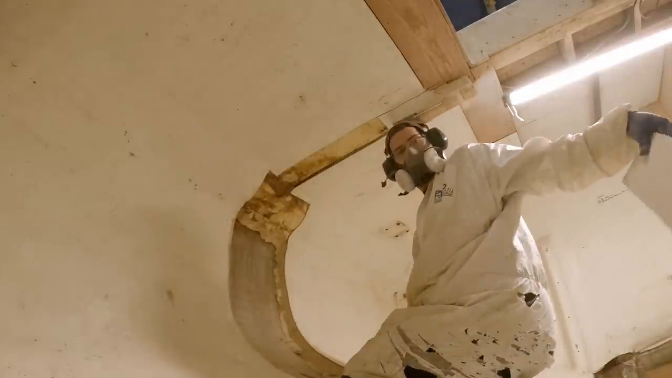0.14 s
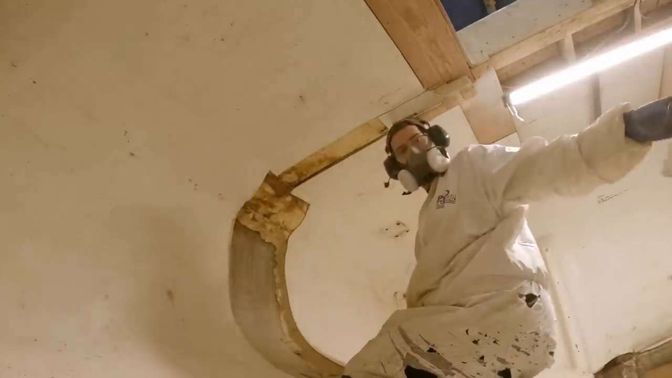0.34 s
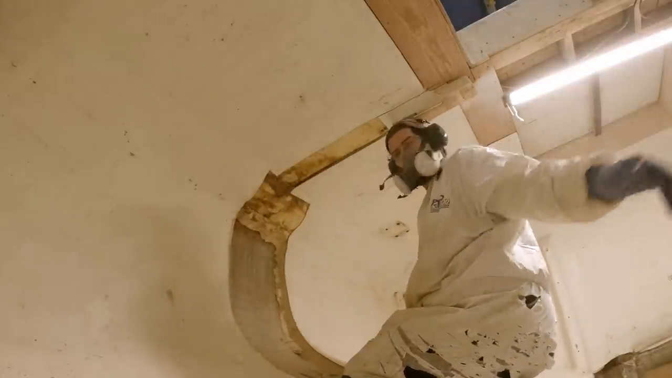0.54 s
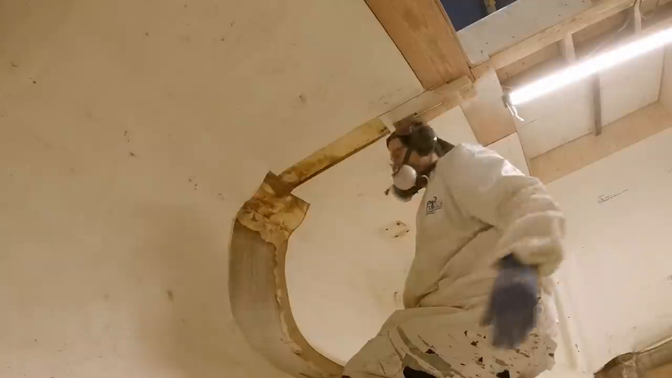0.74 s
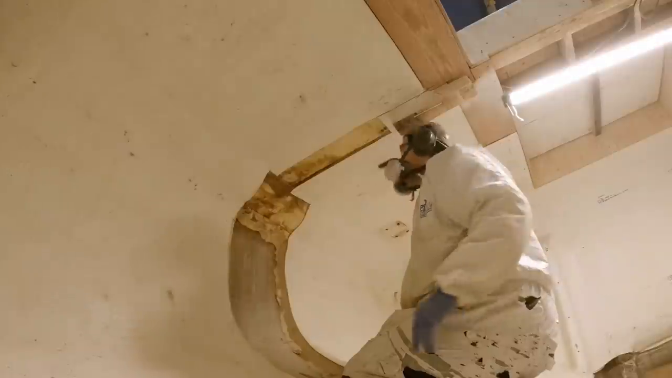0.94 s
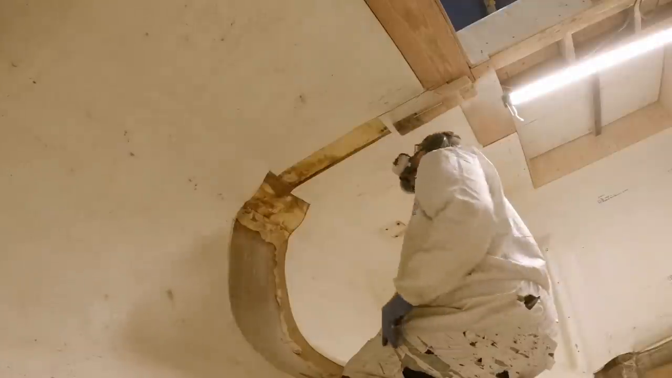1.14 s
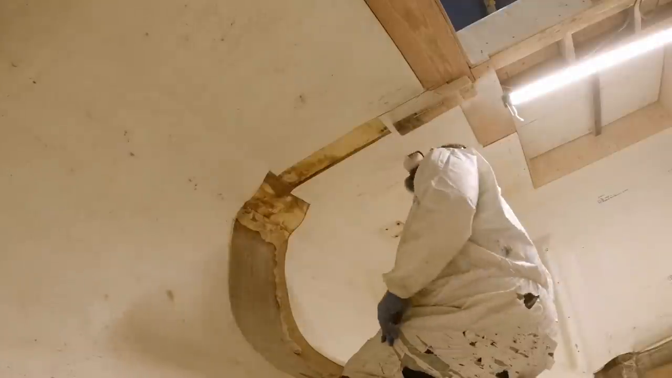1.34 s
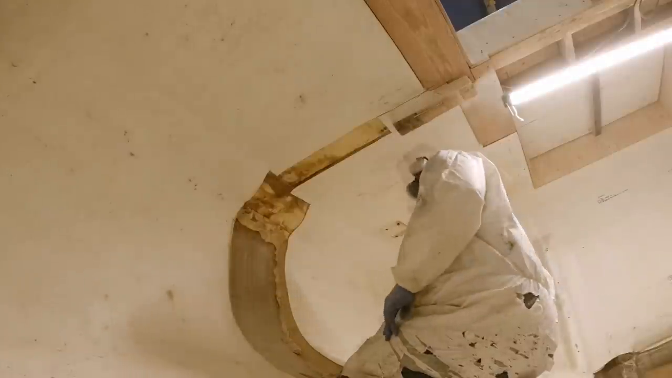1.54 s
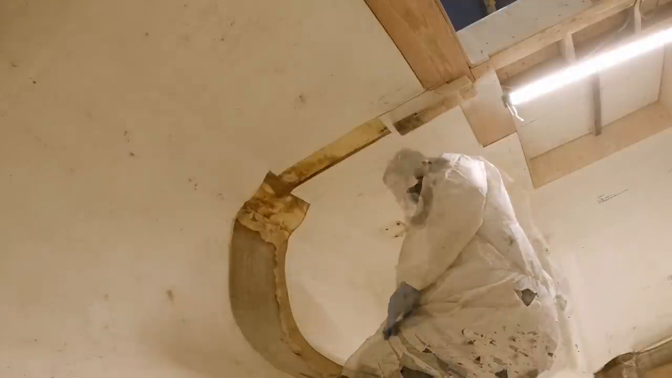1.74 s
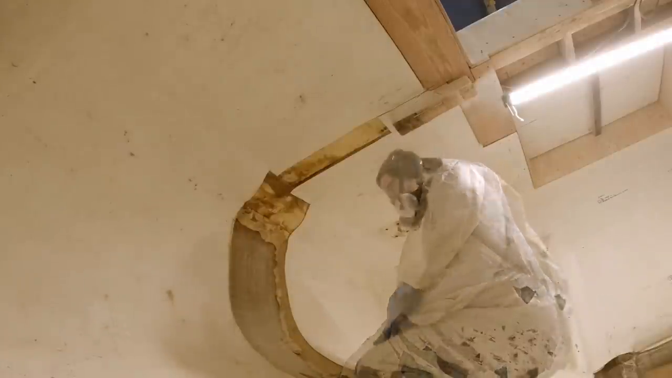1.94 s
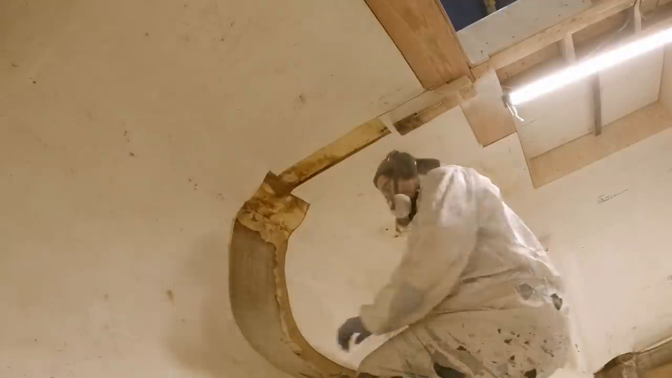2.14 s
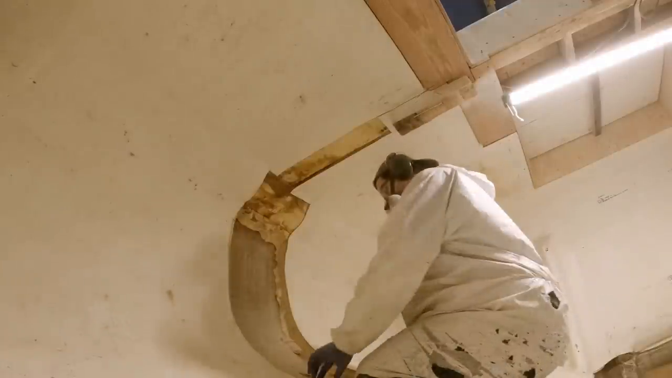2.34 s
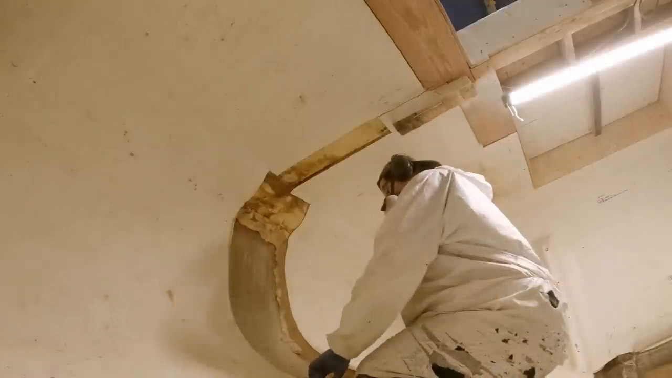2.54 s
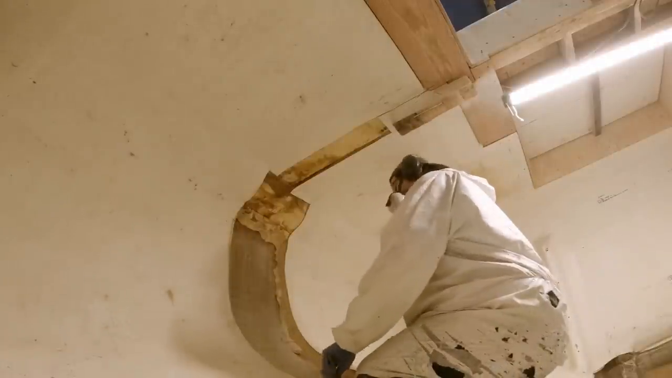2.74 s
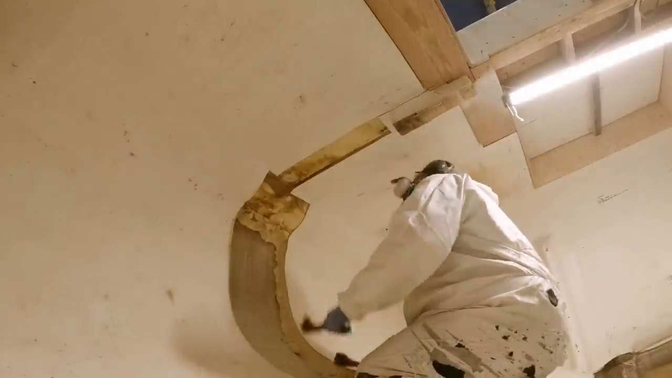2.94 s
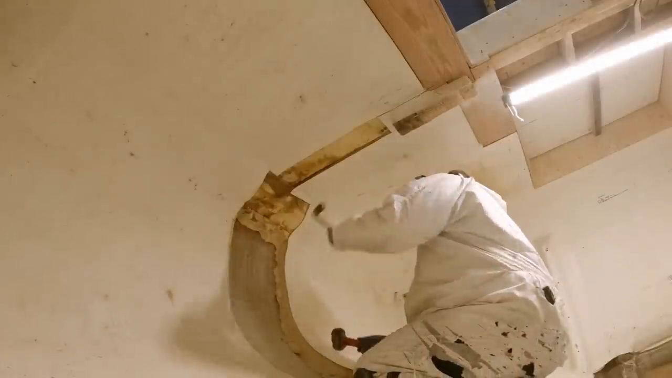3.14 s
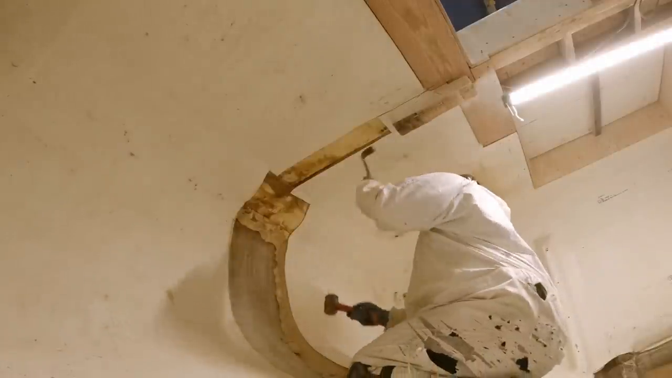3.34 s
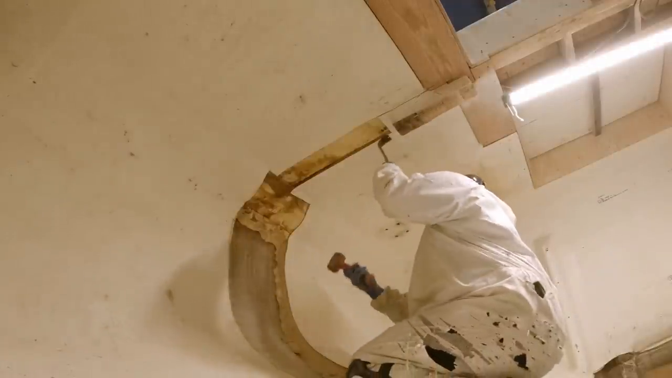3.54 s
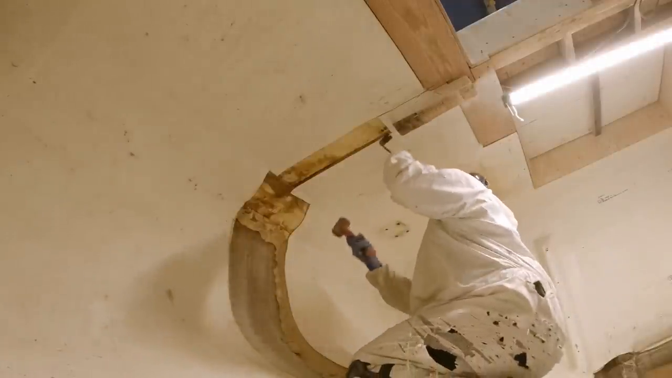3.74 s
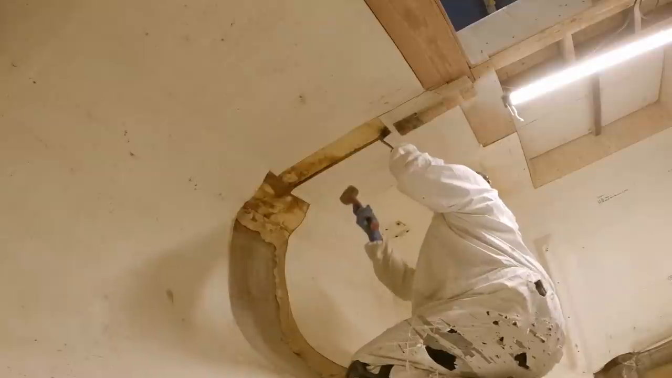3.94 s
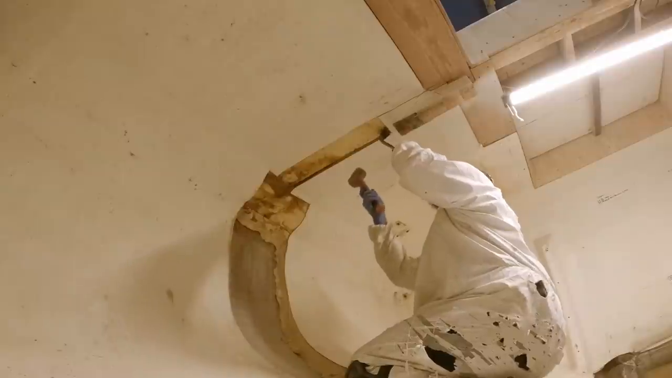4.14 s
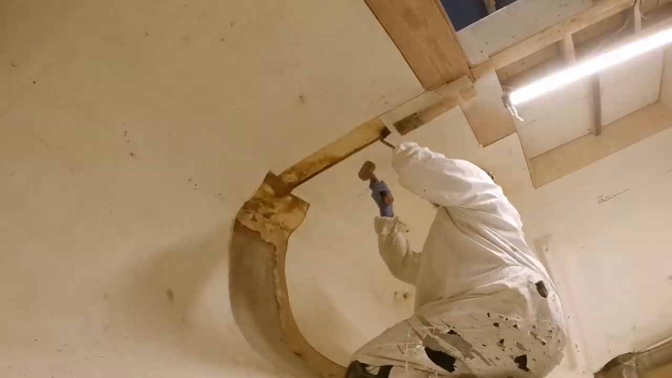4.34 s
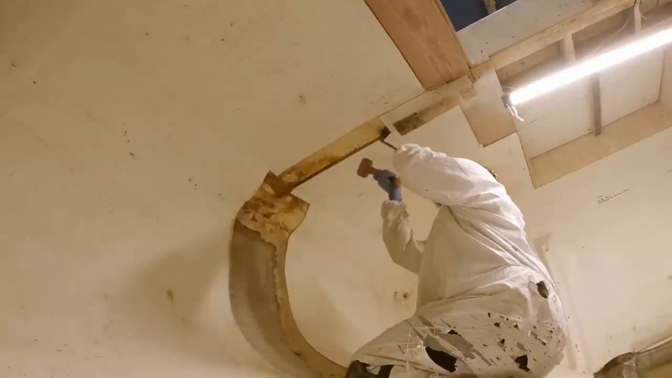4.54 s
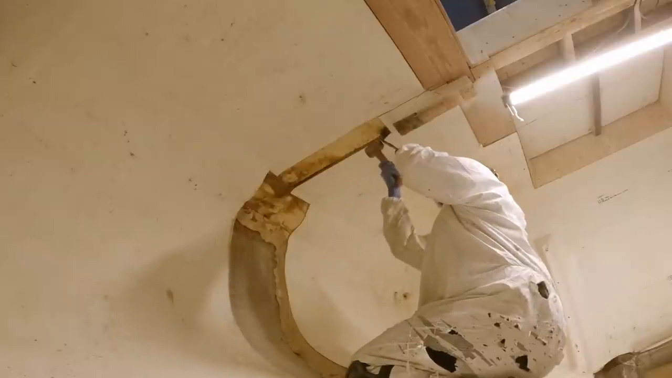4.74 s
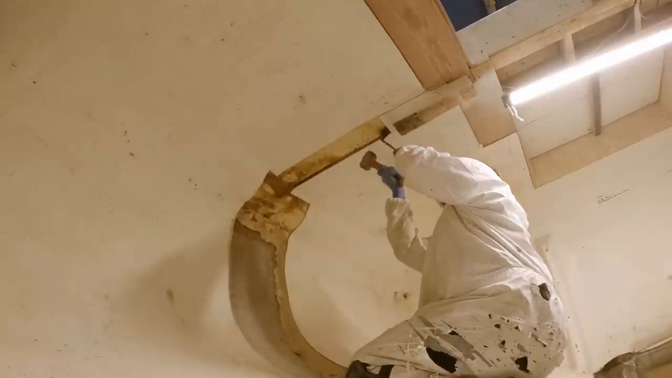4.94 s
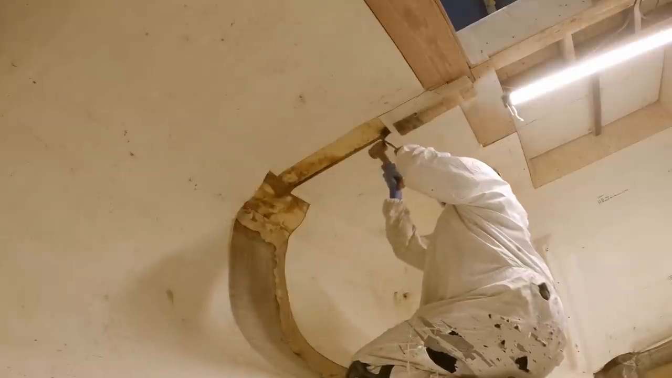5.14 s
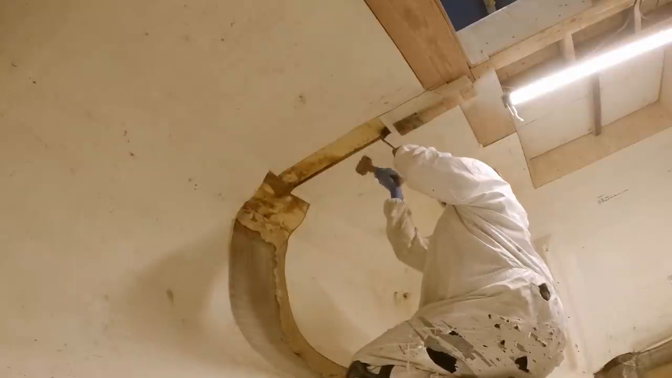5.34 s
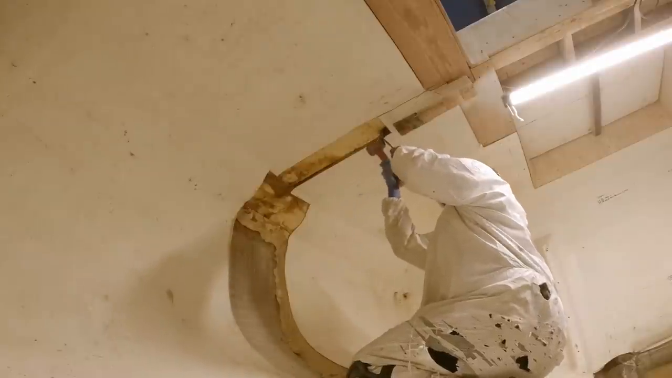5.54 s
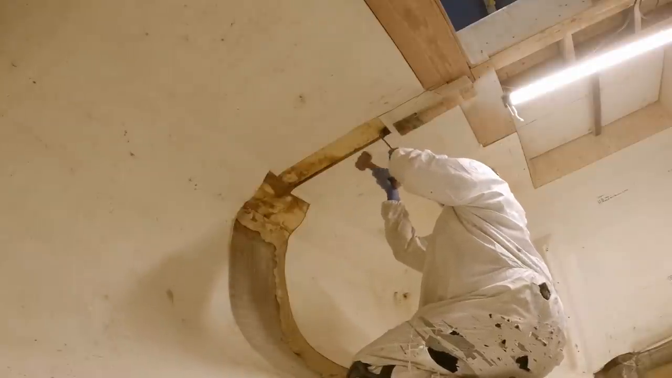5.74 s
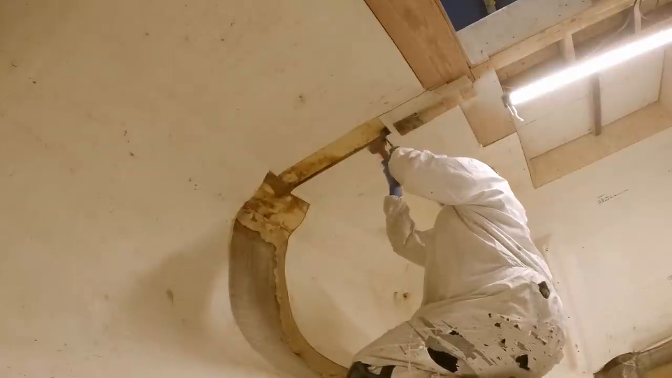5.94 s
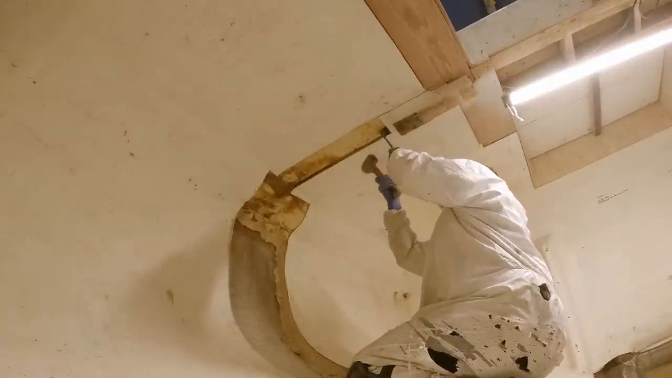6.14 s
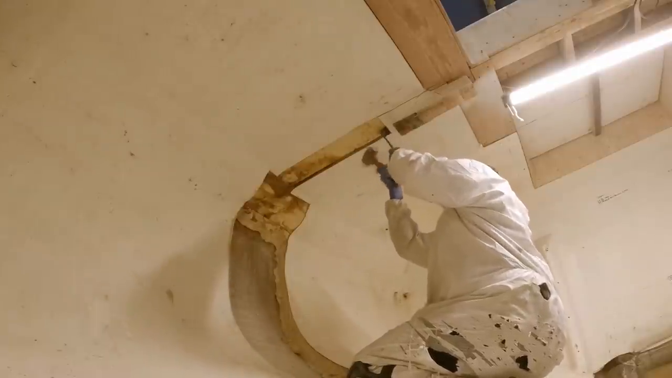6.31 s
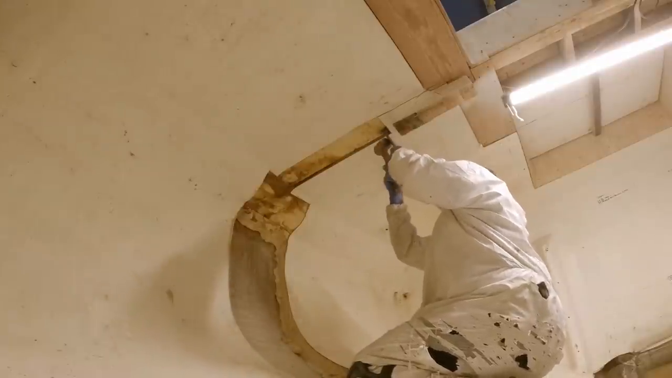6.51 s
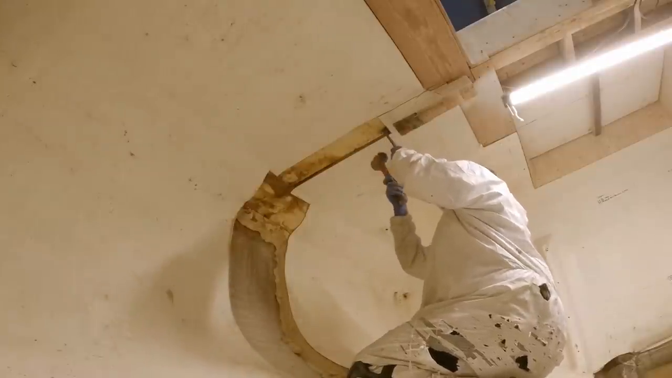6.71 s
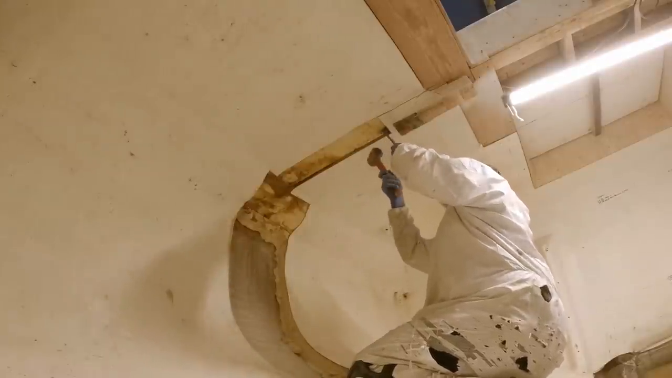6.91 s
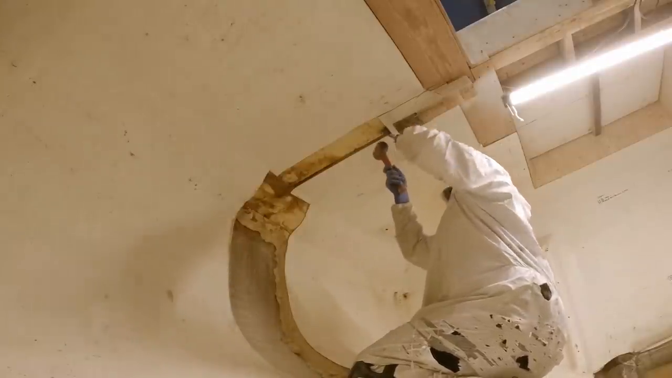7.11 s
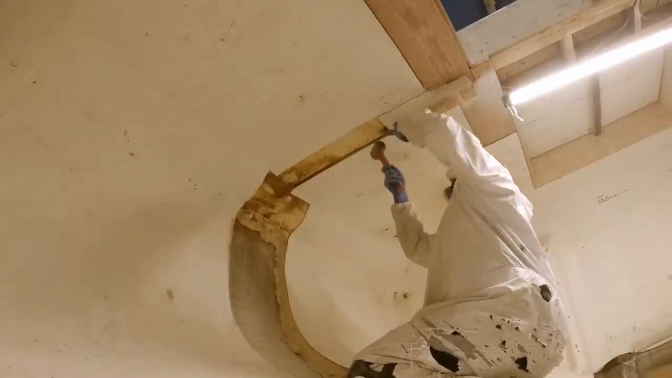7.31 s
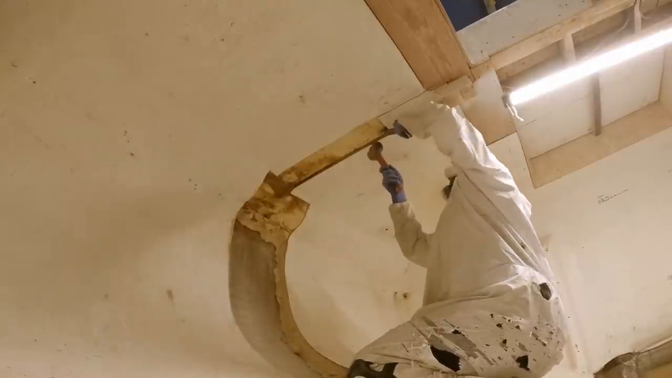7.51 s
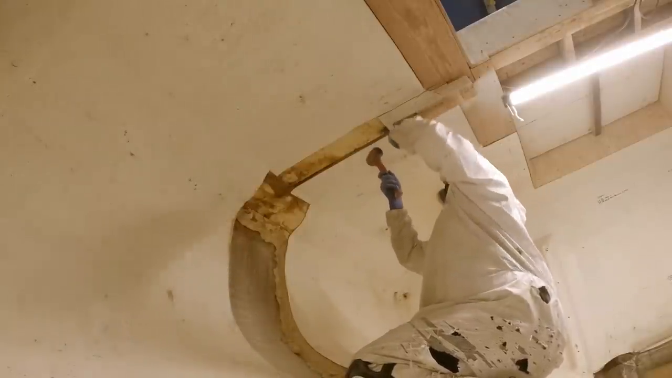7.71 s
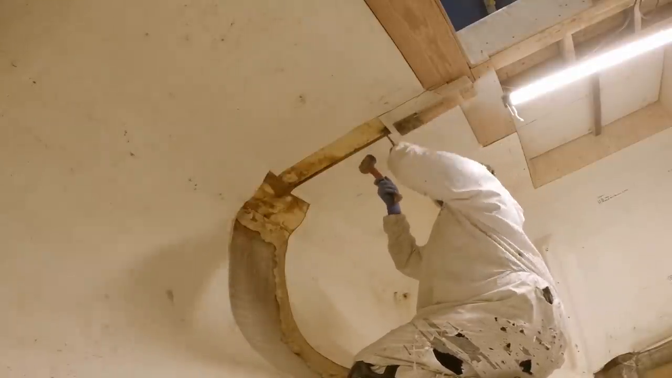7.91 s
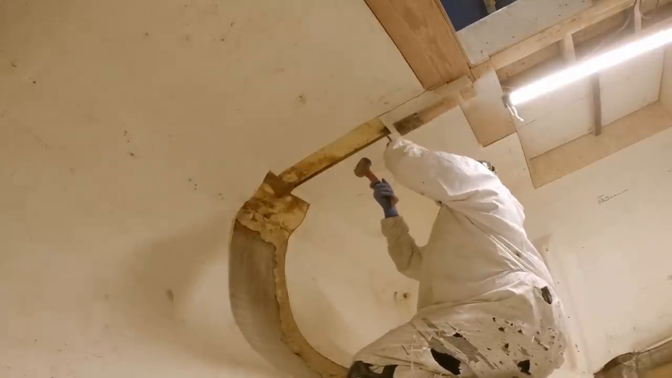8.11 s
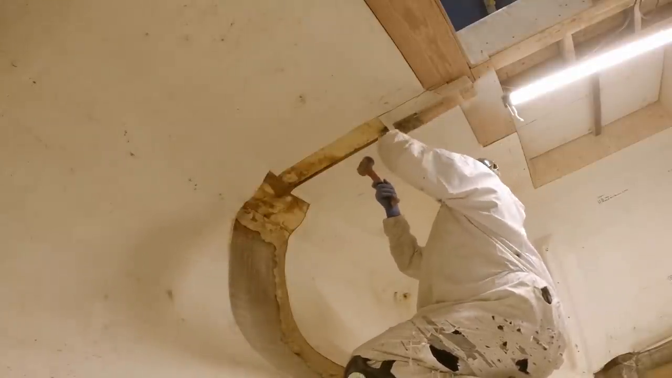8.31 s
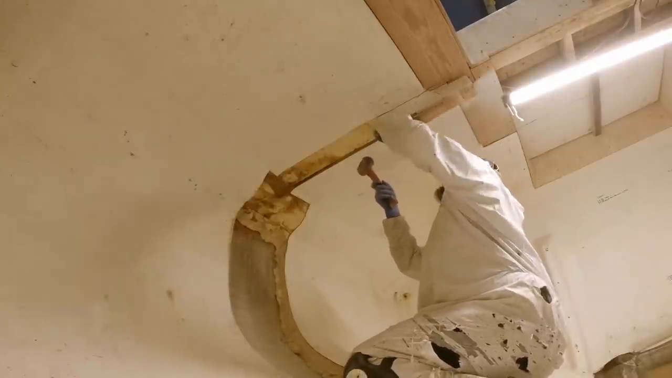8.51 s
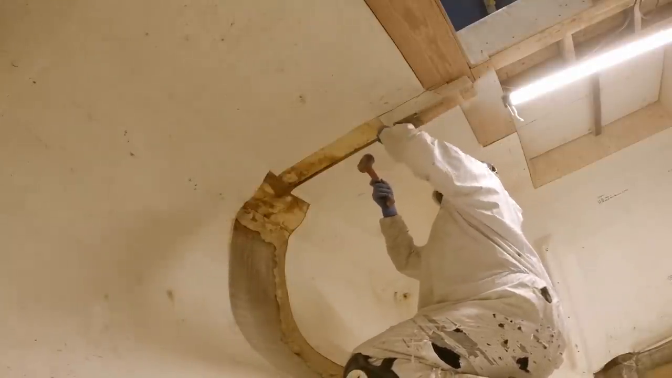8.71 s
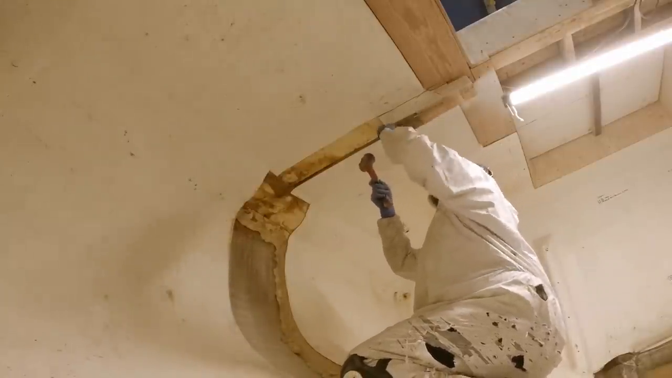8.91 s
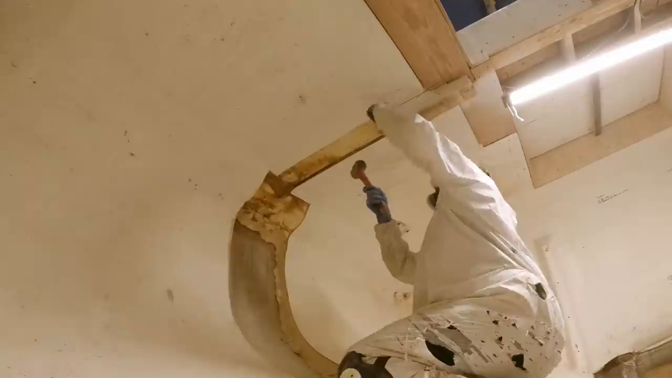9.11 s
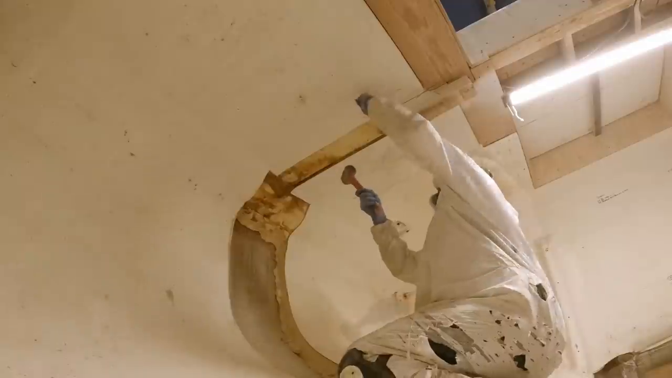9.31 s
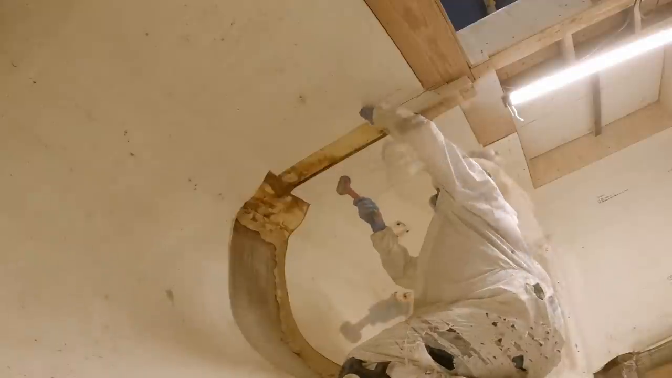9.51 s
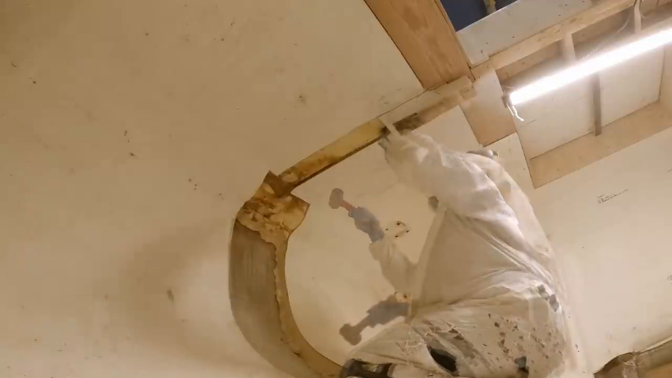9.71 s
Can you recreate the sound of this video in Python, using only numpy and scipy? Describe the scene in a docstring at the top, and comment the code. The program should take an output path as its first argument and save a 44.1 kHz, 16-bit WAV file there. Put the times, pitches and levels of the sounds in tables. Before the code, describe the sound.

Low hum in a resonant boat shell, a heavy thump, quiet fumbling with steel, five hard clanging strikes, then crunchy levering and a falling chunk.

```python
"""A low machine hum and rush of air fill a bare fiberglass hull: sines over coloured noise, with cloth rustling.
A worker drops a plastic tub, bumps about and picks up a steel bar: thumps and bumps are filtered echoes, clinks are modes.
Five hammer blows drive the bar under an old overhead joint: bursts and echoes of its resonances, then hull modes booming.
Levering strokes grind fiberglass and foam as coloured grains; snaps are short bursts; a loosened piece hits the hull.
A gain control ducks at each loud hit and creeps back."""
import sys
import numpy as np
from scipy import signal
from scipy.fft import rfft, irfft
from scipy.io import wavfile
from scipy.ndimage import uniform_filter1d, minimum_filter1d

SR = 44100
rng = np.random.default_rng(int(sys.argv[2]) if len(sys.argv) > 2 else 0)


def transcribe(signal):
    """Save signal, clipped to [-1, 1], as a 16-bit WAV file at the path in sys.argv[1]."""
    frames = np.atleast_2d(signal).T
    limited = np.clip(frames, -1, 1)
    pcm = np.round(limited * 32767).astype(np.int16)
    wavfile.write(sys.argv[1], SR, pcm)


N = 434826
T = np.arange(N) / SR  # s
HZ = np.maximum(np.fft.rfftfreq(8192, 1 / SR), 1)  # axis of all filter gains


def amp(db):
    """Decibels to gain."""
    return 10 ** (np.asarray(db) / 20)


def decay(t_s, t60_s):
    """Gain falling 60 dB per t60."""
    return amp(-60 * t_s / t60_s)


def evened(x):
    """Scales to rms 1."""
    return x / np.sqrt(np.mean(x ** 2) + 1e-20)


def read(points, hz=HZ):
    """Joins (Hz, value) points on a log-frequency axis."""
    f, value = np.transpose(points)
    return np.interp(np.log(hz + 1), np.log(f + 1), value)


def add(mix, start_s, sound):
    """Mixes a sound into both channels at its start time."""
    part = mix[:, round(start_s * SR):][:, :sound.shape[1]]
    part += sound[:, :part.shape[1]]


def peak(hz, width_hz):
    """A resonance of height 1."""
    return 1 / (1 + (2 * (HZ - hz) / width_hz) ** 2)


def hump(hz, octaves):
    """A broad band with steep skirts, as a gain."""
    return (1 + (np.log2(HZ / hz) / (2 * octaves)) ** 2) ** -3.0


def panel(depth_db=5.0):
    """Each struck spot has its own crowd of small resonances, wider apart in the treble."""
    index = np.arange(150)
    knots_hz = 400 * np.expm1(index / 40) + 20 * index
    return amp(depth_db * np.interp(HZ, knots_hz, rng.standard_normal(len(knots_hz))))


def colour(x, gain):
    """Causal minimum-phase filter with the given gain over HZ, floored 100 dB below its top."""
    cepstrum = irfft(np.log(np.maximum(gain / gain.max(), 1e-5)))
    half = len(cepstrum) // 2
    folded = np.r_[cepstrum[0], 2 * cepstrum[1:half]]
    taps = irfft(np.exp(rfft(folded, 2 * half)))[:half]
    return signal.oaconvolve(x, taps[None], axes=1)[:, :x.shape[1]]


# Likeness of the two microphones. Each row: frequency in Hz, correlation from 0 to 1.
LIKENESS = [(50, 1), (250, .97), (500, .87), (1000, .83), (4000, .8), (12000, .62)]
# Lean to the left. Each row: frequency in Hz, left over right in dB.
LEFT_LEAN = [(90, 0), (300, 1.2), (1500, 2.1), (4000, 1), (8000, 2.5)]


def pair(x):
    """Two unrelated signals become a close microphone pair: alike in the bass, looser in the treble."""
    a, b = rfft(x)
    hz = np.fft.rfftfreq(x.shape[1], 1 / SR)
    same = np.clip(read(LIKENESS, hz), 0, 1)
    lean = amp(read(LEFT_LEAN, hz) / 2)
    mid = a * np.sqrt((1 + same) / 2)
    side = b * np.sqrt((1 - same) / 2)
    return irfft([(mid + side) * lean, (mid - side) / lean], x.shape[1])


def noise_pair(n):
    """White noise at the microphone pair."""
    return pair(rng.standard_normal((2, n)))


# Decay of the hull's echo, before each sound's stretch. Each row: frequency in Hz, t60 in s.
HULL_DECAY = [(60, 1), (150, 1), (400, 0.96), (1200, 0.72), (4000, 0.73), (8000, 0.55), (14000, 0.19)]


def echo(gain, stretch=1., rise_s=.003, linger_s=.12):
    """The hull's dense echo of one hit: it lingers, then each band dies at its own speed; rms 1 over 0.1 s."""
    hz, t, z = signal.stft(noise_pair(SR), SR, nperseg=256)
    age_s = np.hypot(t, linger_s) - linger_s
    t60_s = stretch * read(HULL_DECAY, hz)[:, None]
    tail = signal.istft(z * decay(age_s, t60_s), SR, nperseg=256)[1][:, :SR]
    onset = 1 - np.exp(-T[:SR] / max(rise_s, 1e-4))
    tail = colour(tail * onset, gain)
    return tail / np.sqrt(np.mean(tail[:, :SR // 10] ** 2))


def crack(gain, fall_s):
    """The direct sound of a hit: a short noise burst with the energy of 5 ms at rms 1."""
    u = T[:4096] / fall_s
    burst = colour(noise_pair(len(u)) * np.sqrt(u) * np.exp(-u), gain)
    return burst / np.sqrt(np.sum(burst ** 2) / (SR / 100))


def grains(per_s, spread_db, wash):
    """Tiny fractures of uneven size over the wash of their own echoes."""
    sizes = amp(spread_db * np.minimum(rng.exponential(1, N), 2))
    sizes = sizes * (rng.random(N) < per_s / SR)
    clicks = signal.lfilter([1], [1, -np.exp(-1 / (0.0034 * SR))], sizes)  # each dies in 3.4 ms
    return evened(pair((evened(clicks) + wash) * rng.standard_normal((2, N))))


# Spectrum of the air. Each row: frequency in Hz, relative density in dB per Hz.
AIR_SPECTRUM = [(15, -25), (25, -13.5), (64, 3.5), (92, -2), (157, -2.5), (180, -8.5), (263, -7),
                (427, -15.5), (818, -22), (1100, -19), (2280, -29.5), (3720, -32), (6740, -39),
                (12200, -57), (16000, -73)]
# Machine hum. Each row: frequency in Hz, rms level in dB.
HUM_TONES = [(64.6, -46), (150.7, -46), (269.2, -55.5), (301.5, -55.5)]


def background(air_db=-38.5, waver_rad=0.48):
    """A steady machine hum, each tone wavering in phase, and a rush of air fill the hull."""
    out = amp(air_db) * evened(colour(noise_pair(N), amp(read(AIR_SPECTRUM))))
    knots_s = np.linspace(0, T[-1], 60)
    for hz, db in HUM_TONES:
        phase = waver_rad * np.interp(T, knots_s, rng.standard_normal(len(knots_s)))
        out += amp(db) * np.sqrt(2) * np.sin(2 * np.pi * hz * T + phase)
    return out


# Body movements in stiff overalls. Each row: middle in s, length in s, level in dB.
MOVEMENTS = [(0.396, 0.14, -46.5), (1.32, 0.36, -45), (2.04, 0.9, -52), (3.277, 0.66, -53)]
# Spectrum of rubbing and breaking, shared by cloth, snaps and prying.
# Each row: frequency in Hz, relative density in dB per Hz.
SCRAPE_SPECTRUM = [(290, -34), (500, -17), (868, -5), (1080, 1), (1550, -14), (1670, -10), (3250, -16.5),
                   (4730, -14.5), (7310, -15), (8330, -20), (12300, -23), (16000, -40)]


def rustle(still_db=-72):
    """Stiff cloth slides over itself, swelling and fading with each movement."""
    speed = amp(still_db)
    for middle_s, length_s, db in MOVEMENTS:
        speed = speed + amp(db) * np.exp(-(2 * (T - middle_s) / length_s) ** 2)
    gain = amp(read(SCRAPE_SPECTRUM)) * hump(3130, 1.28)
    return speed * evened(colour(grains(per_s=500, spread_db=9, wash=3.3), gain))


# Fibres snapping, and at 9.19 s the sharp tick of the bar knocking. Each row: start in s, level in dB, band
# centre in Hz before the scrape spectrum.
SNAP_TICKS = [(0.431, -45, 3980), (1.476, -48, 9000), (4.319, -40, 5160), (5.974, -42.5, 9050),
              (7.2294, -18, 4380), (7.302, -46, 5000), (7.386, -27.5, 4060), (7.7414, -28, 3580),
              (7.865, -32, 3880), (7.945, -31, 3800), (8.217, -33.5, 5000), (8.3184, -35.5, 4330),
              (8.4419, -37.5, 5600), (8.547, -36.5, 6000), (8.936, -23.5, 6550), (9.1046, -31.5, 5050),
              (9.116, -27, 4130), (9.1923, -22.5, 1430), (9.228, -33, 5950), (9.2664, -26, 5400),
              (9.351, -16, 3200)]


def snaps(room_db=-13.0, body_db=-17):
    """Bundles of glass fibre break with a sharp tick that also jolts the panel; one tick gives the sharp onset
    of the bar's knock."""
    out = np.zeros((2, N))
    for s, db, hz in SNAP_TICKS:
        band = hump(hz, 0.76) + amp(body_db) * hump(2700, 1.7)
        gain = amp(read(SCRAPE_SPECTRUM)) * band * panel(depth_db=3)
        add(out, s, amp(db) * crack(gain, fall_s=0.0029))
        add(out, s, amp(db + room_db) * echo(gain, stretch=0.32, rise_s=0.0075, linger_s=0.091))
    return out


# Modes of the hull's skin. Each row: frequency in Hz, height in dB (bumps use half).
SKIN_MODES = [(124, 2.5), (152, 4), (215, 7), (272, 1.5), (420, 5), (448, 5.5), (602, 7), (783, 1),
              (921, 3), (955, 10), (1098, 6), (1678, 9)]


def skin_db():
    """The hull's skin stands out at its own modes."""
    return sum(db * peak(hz, 21) for hz, db in SKIN_MODES)


# Heavy landings. Each row: start in s, level in dB, tilt in dB per octave, panel ring in Hz, ring height in dB,
# clatter and first smack in dB relative to the thump.
HEAVY_LANDINGS = [(0.8087, -12.5, 1, 1210, 1.6, -11.5, 6.6), (9.351, -16, -1.1, 1090, 14, -11, 3.3)]
# Spectrum of a landing. Each row: frequency in Hz, relative density in dB per Hz.
THUMP_SPECTRUM = [(21, -33), (35, -6), (80, -0.5), (134, 0.5), (177, -5.5), (253, -5.5), (410, -6),
                  (442, -10.5), (946, -11.5), (4440, -31), (11900, -51), (15000, -65)]


def thumps(clatter_hz=1850, clatter_lag_s=.04):
    """A heavy thing lands on the hull: a smack, the echo of the rung skin, then a clatter."""
    out = np.zeros((2, N))
    for s, db, tilt_db, ring_hz, ring_db, clatter_db, smack_db in HEAVY_LANDINGS:
        tilt = tilt_db * np.log2(HZ / 500)
        ring = ring_db * peak(ring_hz, 210)
        gain = amp(read(THUMP_SPECTRUM) + tilt + ring + skin_db()) * panel(depth_db=1.5)
        add(out, s, amp(db) * echo(gain, stretch=1.09, rise_s=0.011, linger_s=0.047))
        add(out, s, amp(db + smack_db) * crack(gain * hump(710, 2.64), fall_s=0.0032))
        rattle = hump(clatter_hz, 0.87) * panel(depth_db=2)
        clatter = echo(rattle, stretch=0.51, rise_s=0.004, linger_s=0.45)
        add(out, s + clatter_lag_s, amp(db + clatter_db) * clatter)
    return out


# Knees, boots and tools, and the low bounce of the tub just after it lands. Each row: start in s, level in dB,
# band centre in Hz, width in octaves, rise in s, # share of the hull's decay time.
LIGHT_BUMPS = [(.935, -20.5, 110, 1.2, 0.0028, 0.9), (1.23, -39, 1400, 0.59, 0.0031, 0.61),
               (1.335, -35, 918, 0.19, .03, 0.56), (1.389, -38.5, 1020, 0.41, 0.0091, 0.41),
               (2.247, -50, 680, 0.47, 0.00045, 0.15), (2.489, -36.5, 149, 0.11, 0.011, 1.8),
               (2.628, -36, 640, 0.53, 0.05, 0.45), (2.656, -31.5, 593, 0.59, 0.0022, 0.7),
               (2.654, -34.5, 170, 0.99, 0.002, 1.1), (2.755, -32, 1220, 0.42, 0.00099, 0.69),
               (2.78, -38, 75, 0.52, 0.023, 1.6), (3.049, -39, 1210, 0.57, 0.00094, 0.85),
               (3.159, -43.5, 1500, 0.78, 0.00097, 0.48), (4.002, -32, 139, 1.5, 0.0044, 0.8),
               (4.007, -38.5, 750, 0.64, 0.00086, 0.55), (4.679, -48, 1370, 0.49, 0.0091, 0.49),
               (9.25, -36.5, 1170, 0.49, 0.016, 0.36), (9.365, -25, 181, 0.41, .01, 0.82),
               (9.725, -32, 1700, 0.68, 0.016, 0.25)]


def bumps(tick_db=6):
    """Lighter bumps and scuffs each sound one band of the hull; only a quick contact ticks."""
    out = np.zeros((2, N))
    soft = 1 / (1 + (HZ / 7500) ** 4)
    for s, db, hz, octaves, rise_s, stretch in LIGHT_BUMPS:
        gain = hump(hz, octaves) * soft * panel(depth_db=2.5) * amp(skin_db() / 2)
        add(out, s, amp(db) * echo(gain, stretch, rise_s, linger_s=0.0035))
        quickness = np.exp(-rise_s / 0.0025)
        tick = crack(hump(hz, octaves + 0.14) * soft, fall_s=0.0015)
        add(out, s, amp(db + tick_db) * quickness * tick)
    return out


# Modes of the free steel bar. Each row: frequency in Hz, level in dB, t60 in s.
BAR_MODES = [(1156, 6.5, 0.41), (1894, -8.5, 1.33), (3155, -9.5, 0.67), (4040, 6, 0.32), (5160, -2, 0.36),
             (6270, -7, 0.33), (7320, 0, 0.3)]
# Clinks of the loose bar. Each row: start in s, level in dB, brightness of the contact in Hz.
BAR_CLINKS = [(2.603, -45.5, 6000), (2.755, -36, 5000), (2.761, -36, 11130), (9.191, -36, 1210)]


def clinks(wet_db=-9, tick_db=3):
    """Lifted free, the bar rings with clean, long modes; a soft contact favours the lowest."""
    out, t = np.zeros((2, N)), T[:SR]
    for s, db, top_hz in BAR_CLINKS:
        ring, lines = 0, 0
        for hz, level_db, t60_s in BAR_MODES:
            gain = amp(level_db) / (1 + (hz / top_hz) ** 2)
            turns = hz * (t + s) + 0.39 * rng.random((2, 1))  # each channel has its own phase
            ring = ring + gain * decay(t, t60_s) * np.sin(2 * np.pi * turns)
            lines = lines + gain * peak(hz, 33)
        add(out, s, amp(db) * ring * (1 - np.exp(-t / 0.00046)))
        add(out, s, amp(db + wet_db) * echo(lines, stretch=0.47, rise_s=0.028, linger_s=0.084))
        add(out, s, amp(db + tick_db) * crack(hump(1200, 1.0), fall_s=0.0049))
    return out


# Hammer blows. Each row: start in s, level in dB, hull thud in dB, thud pitch in Hz, upper hull modes in dB,
# tilt above 3 kHz in dB per octave, clang in dB before the common lift, clang in Hz,
# then six weaker resonances of the wedged bar in Hz.
HAMMER_BLOWS = [(4.8231, -20, -14, 157, -19, -1.8, 10, 5150, 1340, 1920, 4090, 5630, 6330, 7210),
                (5.246, -20, -19.5, 115, -3, -2, 8.2, 5720, 1120, 2140, 3840, 4130, 4370, 7400),
                (5.641, -20, -22.5, 108, 5, -1.5, 6, 4000, 1137, 3070, 4680, 5580, 7070, 7670),
                (6.0445, -20.5, -23.5, 127, 8.5, -5.5, 12.2, 4120, 1060, 1650, 3210, 5270, 7630, 10030),
                (6.4792, -20.5, -19, 140, 4.5, -5, 2.7, 5300, 1130, 3010, 3850, 4160, 4540, 7060)]
# The joint crunching under the bar. Each row: frequency in Hz, relative density in dB per Hz.
CRUNCH_SPECTRUM = [(100, -6), (500, -6.5), (800, -13.5), (1050, -4), (1700, -6), (2500, -5.5), (4400, -0.5),
                   (5700, -2.5), (6700, -7), (7950, -4.5), (8400, -13), (10200, -11.5), (10900, -21),
                   (11900, -13), (12800, -27), (13900, -24), (15200, -44)]


def wedged_bar(crack_db=13.5, tick_db=-2, ring_db=-17.0, clang_width_hz=430, clang_lift_db=4,
               mode_db=9.5, mode_width_hz=250):
    """Each blow rings the wedged, damped bar, whose resonances shift as it sinks in."""
    out = np.zeros((2, N))
    tick_gain = hump(5000, 0.9) / (1 + (HZ / 10000) ** 6)
    for s, db, _, _, _, tilt_db, clang_db, clang_hz, *modes_hz in HAMMER_BLOWS:
        weaker = mode_db * np.max([peak(hz, mode_width_hz) for hz in modes_hz], 0)
        clang = (clang_db + clang_lift_db) * peak(clang_hz, clang_width_hz)
        tilt = tilt_db * np.log2(np.maximum(HZ / 3000, 1))
        gain = amp(read(CRUNCH_SPECTRUM) + weaker + clang + tilt) * panel(depth_db=2)
        # the grip of the joint splits each resonance into a close pair
        lines = 0
        for hz in [clang_hz] + modes_hz:
            for shift_hz in rng.normal([-50, 50], 25):
                lines = lines + peak(hz + shift_hz, 30)
        body = echo(gain * (1 + 0.2 * lines), stretch=0.46, rise_s=0.0011, linger_s=0.38)
        ring = echo(gain * lines, stretch=0.35, rise_s=0.0016, linger_s=0.1)
        add(out, s, amp(db + crack_db) * crack(gain * hump(6000, 7.2), fall_s=0.0023))
        add(out, s, amp(db + tick_db) * crack(tick_gain, fall_s=0.00022))
        add(out, s, amp(db) * body)
        add(out, s, amp(db + ring_db) * ring)
    return out


# Low modes of the hull. Each row: frequency in Hz, dB relative to the thud, t60 in s, delay after the blow in s.
HULL_MODES = [(57, 6.5, 1, 0.0295), (71.8, 1.5, 0.89, 0.0393), (123.4, -3, 1, 0.0067),
              (152.5, 0, 0.61, 0.0076), (200, -6, 0.25, 0.00966), (306, 0.5, 0.45, .04),
              (344, -6, 0.96, .045)]


def hull_thud(lag_s=0.00697, rumble_db=-5, return_s=.115, return_db=-8):
    """Just after each blow the hull's low modes thud; the bending wave comes back once along the hull."""
    out, t = np.zeros((2, N)), T[:SR]
    for s, _, thud_db, thud_hz, upper_db, *_ in HAMMER_BLOWS:
        # a softer contact favours the lower hull modes
        push = hump(thud_hz, 1.0) * amp(upper_db * peak(336, 83))
        for hz, level_db, t60_s, delay_s in HULL_MODES:
            level = amp(thud_db + level_db) * np.interp(hz, HZ, push)
            envelope = decay(t, t60_s) * (1 - np.exp(-t / 0.0014))
            mode = level * envelope * np.sin(2 * np.pi * hz * t)
            add(out, s + delay_s, mode[None])
        rumble = echo(hump(thud_hz, 0.62), stretch=0.61, rise_s=0.0008, linger_s=0.028)
        rumble = amp(thud_db + rumble_db) * rumble
        add(out, s + lag_s, rumble)
        add(out, s + lag_s + return_s, amp(return_db) * rumble)
    return out


def boom(hz=48.6, db=-22.0, t60_s=4.3, rise_s=0.026):
    """Every blow renews the slow swing of the whole hull."""
    swings = []
    for s, *_ in HAMMER_BLOWS:
        swings.append(np.clip((T - s) / rise_s, 0, 1) * decay(np.maximum(T - s, 0), t60_s))
    tone = np.sin(2 * np.pi * hz * (T - HAMMER_BLOWS[0][0]))
    return amp(db) * np.sqrt(2) * np.max(swings, 0) * tone


# Strokes of the pry bar. Each row: time of full force in s, build-up in s, hold in s, level in dB,
# treble in dB before the common treble level.
PRY_STROKES = [(7.197, 0.29, 0.16, -32.5, -6), (7.74, 0.049, 0.13, -29, -8.5),
               (8.04, 0.051, 0.018, -38.5, -11), (8.24, 1, 0.071, -47.5, -4.5),
               (8.547, 0.56, 0.0066, -41.5, -6.5), (8.807, 0.056, 0.0056, -34, -8.5),
               (9.105, 0.095, 0.35, -33.5, -6), (9.49, 0.16, 0.11, -24.5, -19),
               (9.774, 0.19, 0.033, -25.5, 2.5)]


def prying(body_db=-4, groan_db=-14, treble_db=-3.5, resting_db=-62, build_db=34.5, ease_db_per_s=84):
    """The bar grinds foam and fibre: force builds, holds and eases off; each stroke rubs another spot."""
    out = np.zeros((2, N))
    coarse = grains(per_s=200, spread_db=5, wash=0.8)
    fine = grains(per_s=220, spread_db=5, wash=1.0)
    high = 1 / (1 + (6000 / HZ) ** 8)
    for s, build_s, hold_s, db, bright_db in PRY_STROKES:
        span = (T > s - 1.5 * build_s - .02) & (T < s + hold_s + .7)
        t = T[span] - s
        swell_db = build_db * np.minimum(t, 0) / max(build_s, .005)
        ease_db = ease_db_per_s * np.maximum(t - hold_s, 0)
        force = amp(db + swell_db - ease_db)
        gain = amp(read(SCRAPE_SPECTRUM)) * panel(depth_db=4)
        body = evened(colour(coarse[:, span], gain * (1 - high) * hump(3920, 1.3)))
        groan = evened(colour(coarse[:, span], hump(320, 1.28) * panel()))
        fizz = evened(colour(fine[:, span], gain * high * hump(3550, 0.77)))
        grind = amp(body_db) * body + amp(groan_db) * groan + amp(treble_db + bright_db) * fizz
        out[:, span] += force * grind
    # between strokes the bar still rubs lightly
    first_s, first_build_s = PRY_STROKES[0][:2]
    touching = np.clip((T - first_s + first_build_s) / 0.38, 0, 1)
    rub = evened(colour(coarse, amp(read(SCRAPE_SPECTRUM)) * hump(3000, 1.1)))
    return out + amp(resting_db) * touching * rub


def gain_control(x, threshold_db=-21, ratio=2.39, hold_s=0.47, recover_db_per_s=7.5):
    """Turns down at once above the threshold, holds, then recovers steadily."""
    power = abs(uniform_filter1d((x ** 2).mean(0), size=130))
    level_db = 10 * np.log10(power + 1e-12)
    cut_db = np.minimum(threshold_db - level_db, 0) * (1 - 1 / ratio)
    half = round(hold_s * SR / 2)
    held_db = minimum_filter1d(cut_db, 2 * half + 1, origin=half)
    climb_db = recover_db_per_s * T
    gain_db = np.minimum.accumulate(held_db - climb_db) + climb_db
    return x * amp(uniform_filter1d(gain_db, size=90))


def scene():
    """All sources at the microphone pair."""
    quiet = background() + rustle() + snaps()
    handling = thumps() + bumps() + clinks()
    work = wedged_bar() + hull_thud() + boom() + prying()
    return quiet + handling + work


def record(dry, edge_hz=15800):
    """Gain control, then the band limit."""
    lowpass = signal.firwin(511, edge_hz, window=("kaiser", 9), fs=SR)
    return signal.oaconvolve(gain_control(dry), lowpass[None], "same")


dry = scene()
out = record(dry)
transcribe(out)
```